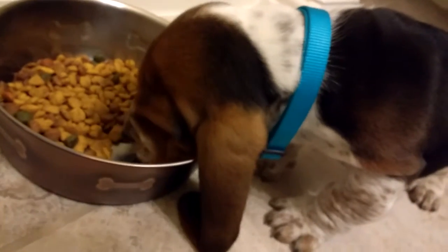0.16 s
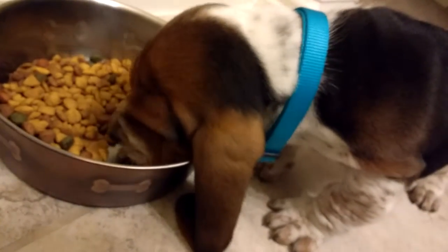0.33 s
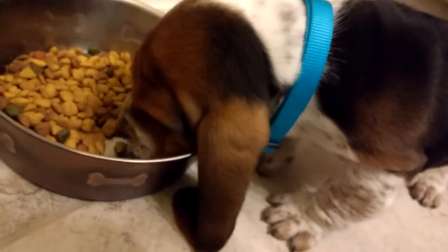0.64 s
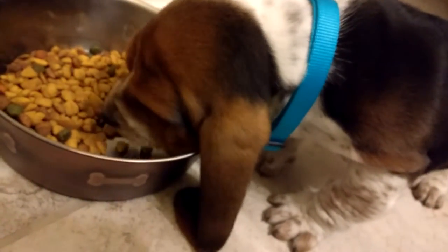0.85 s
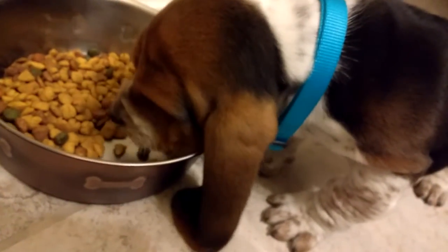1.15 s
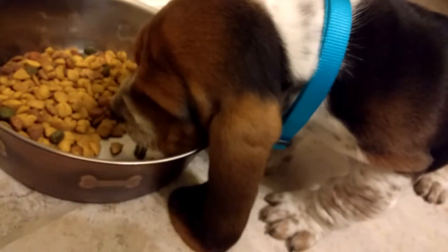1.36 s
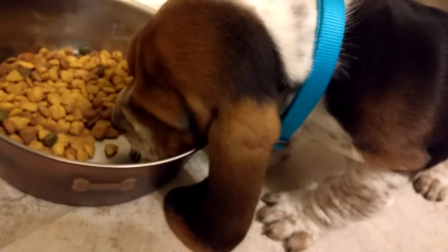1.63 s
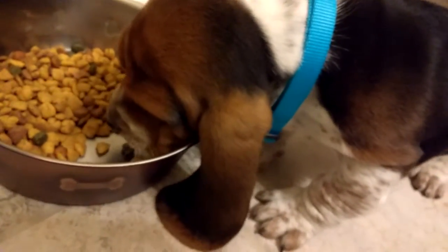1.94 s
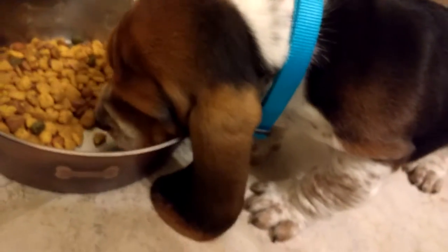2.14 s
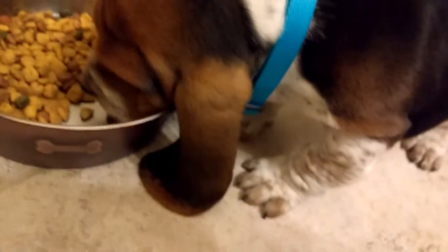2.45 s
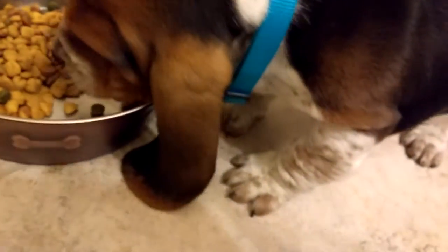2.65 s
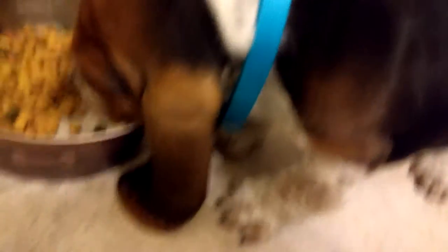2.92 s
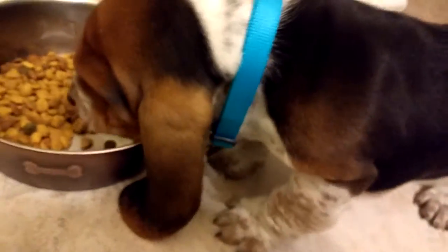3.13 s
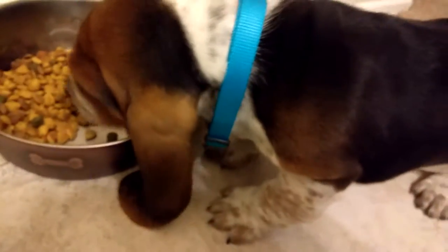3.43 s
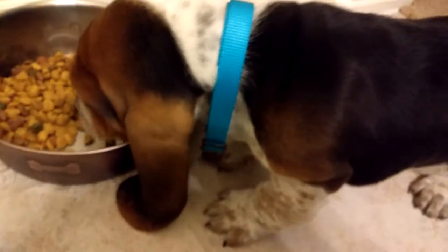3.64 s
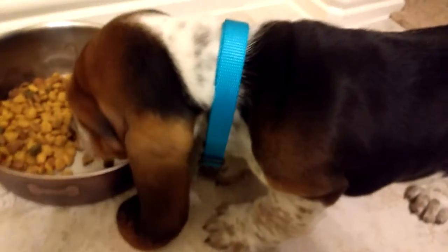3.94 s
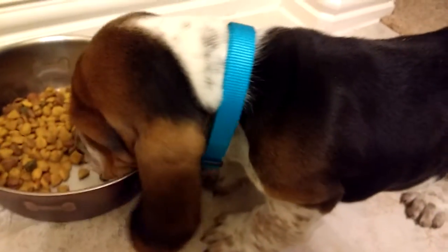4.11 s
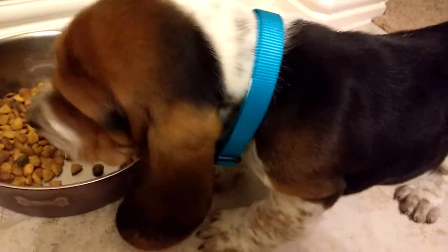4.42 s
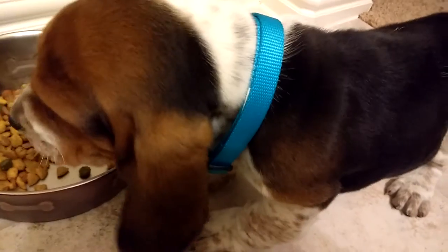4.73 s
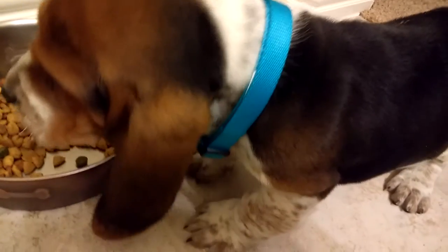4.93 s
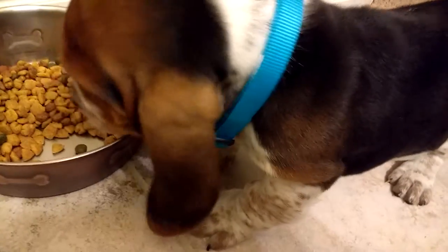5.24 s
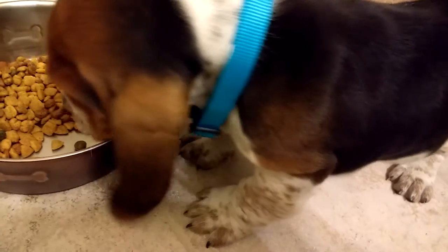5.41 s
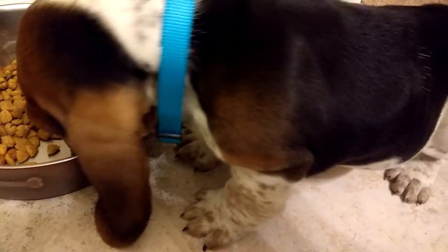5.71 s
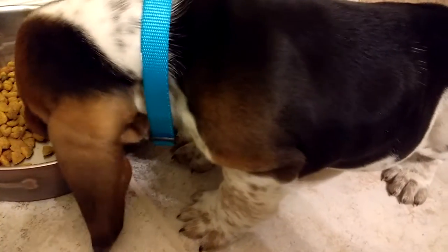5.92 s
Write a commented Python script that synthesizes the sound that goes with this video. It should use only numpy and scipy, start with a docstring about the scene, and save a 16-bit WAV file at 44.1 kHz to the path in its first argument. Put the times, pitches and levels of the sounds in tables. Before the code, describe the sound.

Close up indoors, a dog chews brittle pellets loudly at first, then softly, snuffling and rustling through the food over a low drone.

```python
"""Room tone and a low drone; a click, soft nose hisses and wet smacks; then a dog crunches dry kibble.
Heard from close above, from a steel bowl on a hard floor in a small live room. Hard crunches come early,
lighter ones later. Breaking pellets are impulse showers that ring mouth and jaw resonances; snaps, smacks
and clicks are short filtered showers; jowl flaps are damped sinking sines; stirred pellets, bowl hum,
nose and ear are shaped noise. A moving set of reflections and a widening recorder follow."""
import sys
import numpy as np
from scipy import signal
from scipy.fft import rfft, irfft, next_fast_len
from scipy.io import wavfile

SR = 44100
rng = np.random.default_rng(int(sys.argv[2]) if len(sys.argv) > 2 else 0)


def master_out(mix):
    """Clip the mix to full scale and print it as 16-bit PCM to the path in sys.argv[1]."""
    frames = np.transpose(np.atleast_2d(mix))
    ceiling = np.clip(frames, -1, 1)
    pcm = np.round(ceiling * 32767).astype(np.int16)
    wavfile.write(sys.argv[1], SR, pcm)


N = 267687
TIME = np.arange(N) / SR
HIT = TIME[:4096]  # time axis of one short event, s


def from_db(db):
    """Decibels to amplitude gain."""
    return 10 ** (np.asarray(db) / 20)


def rms_one(x):
    """Scale to rms 1."""
    return x / np.sqrt(np.mean(x ** 2) + 1e-20)


def unit(x):
    """Scale each channel to energy 1."""
    return x / np.sqrt(np.sum(x ** 2, axis=-1, keepdims=True) + 1e-20)


def at_hz(points, hz):
    """Interpolate a table on a log-frequency axis."""
    point_hz, value = np.transpose(points)
    return np.interp(np.log(np.maximum(hz, 1)), np.log(point_hz), value)


def colour(x, spectrum, lag_s=0):
    """Apply a spectrum and a pure delay in the frequency domain."""
    size = next_fast_len(x.shape[-1] + len(HIT))
    hz = np.fft.rfftfreq(size, 1 / SR)
    response = from_db(at_hz(spectrum, hz)) * np.exp(-2j * np.pi * hz * lag_s)
    return irfft(rfft(x, size) * response, size)[..., :x.shape[-1]]


def resonate(x, hz, width_hz):
    """Two-pole resonance with peak gain 1."""
    r = np.exp(-np.pi * width_hz / SR)
    zeros = np.array([1, 0, -1]) * (1 - r * r) / 2
    poles = [1, -2 * r * np.cos(2 * np.pi * hz / SR), r * r]
    return signal.lfilter(zeros, poles, x)


def resonate_twice(x, hz, width_hz):
    """Two equal resonances in series: steeper skirts."""
    return resonate(resonate(x, hz, width_hz), hz, width_hz)


def resonances(force, modes):
    """Parallel modes (hz, width_hz, level_db) of alternating sign, driven by one force."""
    return sum((-1) ** k * from_db(level_db) * resonate(force, hz, width_hz)
               for k, (hz, width_hz, level_db) in enumerate(modes))


def add(out, start_s, sound):
    """Mix a sound in at start_s."""
    i = max(round(start_s * SR), 0)
    out[i:i + len(sound)] += sound[:max(N - i, 0)]


def swells(rows):
    """Sum of half-cosine gain humps (middle_s, length_s, level_db)."""
    return sum(from_db(level_db) * np.cos(np.pi * np.clip((TIME - middle_s) / length_s, -.5, .5))
               for middle_s, length_s, level_db in rows)


def grains(size, per_s, spread_db):
    """Random clicks of random sign and uneven strength."""
    strength = from_db(spread_db * np.minimum(rng.exponential(1, size), 4))
    return (rng.random(size) < per_s / SR) * strength * rng.choice([-1, 1], size)


def fracture(crumble, fade_s):
    """One break, then a quickly thinning shower of smaller ones."""
    shower = grains(len(HIT), per_s=5000, spread_db=3)
    force = crumble * unit(shower * np.exp(-HIT / fade_s))
    force[0] += 1
    return force


# room tone spectrum: hz, relative level_db
ROOM_TONE_SPECTRUM = [(20, -28), (45, -28), (70, -0.5), (100, 0), (150, -2.5), (250, -7.5), (400, -10),
                      (800, -14.5), (1500, -22.5), (3500, -20.5), (8000, -25), (13500, -36), (16000, -34)]


def room_tone(level_db):
    """Steady coloured noise, independent in each channel."""
    return from_db(level_db) * rms_one(colour(rng.standard_normal((2, N)), ROOM_TONE_SPECTRUM))


def hum(level_db, hz, width_hz, lag_s):
    """Narrow-band noise: a low, unsteady drone that reaches the right side later."""
    drone = rms_one(resonate_twice(rng.standard_normal(N), hz, width_hz))
    return from_db(level_db) * np.array([drone, np.interp(TIME - lag_s, TIME, drone)])


# long ear brushing the floor: middle_s, length_s, level_db
EAR_BRUSHES = [(2.15, 1, -66)]
# fur spectrum: hz, relative level_db
FUR_SPECTRUM = [(1500, -15), (6000, -3), (10000, 2), (16000, 3)]


def ear():
    """Fur sliding over the hard floor: a soft, even hiss."""
    return swells(EAR_BRUSHES) * rms_one(colour(rng.standard_normal(N), FUR_SPECTRUM))


# puffs of air through the nose: middle_s, length_s
NOSE_PUFFS = [(0.116, 0.073), (0.27, 0.061), (1.478, 0.1), (2.07, 0.29), (2.683, .32), (2.931, .05),
              (3.137, 0.15), (3.574, 0.12), (4.16, .26), (4.438, 0.35), (4.9, 0.099), (5.17, 0.068),
              (5.353, 0.069), (5.522, 0.19), (5.826, .35)]
# nostril hiss spectrum: hz, relative level_db
NOSE_SPECTRUM = [(4000, -12), (5700, -15), (6450, 4.5), (7300, -5), (8500, -3), (10000, -11), (16000, -75)]
NOSE_DB, PUFF_S, PUFF_DB_PER_DOUBLING = -59, 0.12, -1  # level of a PUFF_S puff; longer is softer


def nose():
    """Thin hiss of narrow nostrils, stronger when the air is pushed out quickly."""
    puffs = [(middle_s, length_s, NOSE_DB + PUFF_DB_PER_DOUBLING * np.log2(length_s / PUFF_S))
             for middle_s, length_s in NOSE_PUFFS]
    return swells(puffs) * rms_one(colour(rng.standard_normal(N), NOSE_SPECTRUM))


# muzzle rubbing the bowl: middle_s, length_s, relative level_db
BOWL_RUBS = [(0.28, 0.29, -51.5), (2.8, 0.46, -49), (3.65, 0.67, -60.5), (6.02, 0.47, -47.5)]


def bowl(gain_db, hz, width_hz):
    """Friction noise keeps the lowest mode of the filled bowl ringing roughly."""
    friction = rng.standard_normal(N)
    return from_db(gain_db) * swells(BOWL_RUBS) * rms_one(resonate_twice(friction, hz, width_hz))


# muzzle effort in the pile: time_s, relative level_db
STIR_EFFORT = [(0, -60), (0.17, -58), (0.36, -54), (0.6, -62), (0.9, -53.5), (1.1, -65), (1.88, -61.5),
               (2.08, -51.5), (2.45, -56), (3.0, -54), (3.22, -59.5), (3.42, -52), (3.8, -50), (4.05, -57),
               (4.28, -64.5), (4.95, -76.5), (5.6, -62), (6.07, -58.5)]
# dull pellet contacts, spectrum: hz, relative level_db
DULL_SPECTRUM = [(200, -14), (380, -13), (520, 2.5), (680, -10), (840, -4.5), (1000, -11), (1250, -7.5),
                 (1700, -11), (2600, -7.5), (5000, -48)]
# crisp pellet rubbing, spectrum: hz, relative level_db
CRISP_SPECTRUM = [(1200, 11.5), (2200, 0), (3300, 5.5), (5000, 11.5), (8500, 5), (13000, -17), (16000, -16)]


def rustle(low_db, crisp_db, crisp_follows):
    """Pellets rub and tumble as the muzzle pushes through: dull contacts plus crisp rubbing."""
    effort_db = np.interp(TIME, *np.transpose(STIR_EFFORT))
    contacts = rms_one(grains(N, per_s=700, spread_db=5))
    rubbing = rms_one(contacts + .8 * rng.standard_normal(N))
    dull = from_db(effort_db + low_db) * rms_one(colour(contacts, DULL_SPECTRUM))
    crisp_gain = from_db(crisp_db + crisp_follows * (effort_db - effort_db.mean()))
    return dull + crisp_gain * rms_one(colour(rubbing, CRISP_SPECTRUM))


# jowls flapping shut: start_s, relative level_db
JOWL_FLAPS = [(0.802, -31), (1.092, -31), (1.415, -36.5), (2.027, -35), (2.534, -38), (2.994, -30),
              (3.453, -24), (5.32, -26.5)]
FLAP_HZ, FLAP_HZ_PER_DB, FLAP_SAG_PER_S = 299, 7, 10.4  # hardest flap's start pitch; softer is lower
FLAP_SLOWER_PER_DB = 0.08  # softer flaps take longer


def flaps(gain_db, rise_s, fade_s, late_s):
    """Cheeks trap an air pocket: a few low damped cycles, higher and shorter when shut harder."""
    out = np.zeros(N)
    hardest_db = max(level_db for _, level_db in JOWL_FLAPS)
    for start_s, level_db in JOWL_FLAPS:
        softer_db = hardest_db - level_db
        t = HIT / (1 + FLAP_SLOWER_PER_DB * softer_db)
        swell = (1 - np.exp(-t / rise_s)) ** 2 * np.exp(-t / fade_s)
        hz = (FLAP_HZ - FLAP_HZ_PER_DB * softer_db) * np.exp(-FLAP_SAG_PER_S * HIT)
        cycles = np.sin(2 * np.pi * np.cumsum(hz) / SR)
        add(out, start_s + late_s, from_db(level_db + gain_db) * swell / swell.max() * cycles)
    return out


# wet smacks of tongue and lips: start_s, relative level_db, pitch_hz
TONGUE_SMACKS = [(0.265, -41, 4070), (0.323, -44.5, 3270), (0.358, -41.5, 3230), (0.442, -33.5, 2784),
                 (3.432, -31, 6940), (3.444, -28, 8800), (4.0177, -30, 4900), (4.028, -33.5, 5560),
                 (4.156, -43, 3300), (4.177, -41, 3070), (4.449, -40, 2980), (4.485, -43.5, 13000),
                 (4.564, -37, 2280), (5.756, -36.5, 1960), (5.917, -32, 2170), (5.932, -28.5, 2240)]
# saliva spray spectrum: hz, relative level_db
SPRAY_SPECTRUM = [(1500, -29), (3000, -83), (6000, 107), (11000, -25), (16000, -33)]


def smacks(gain_db, width_share, spray):
    """A saliva film tears in a few quick pops that ring a tiny cavity."""
    out = np.zeros(N)
    for start_s, level_db, pitch_hz in TONGUE_SMACKS:
        pop = fracture(crumble=0.95, fade_s=0.0005)
        cavity = unit(resonate_twice(pop, pitch_hz, width_share * pitch_hz))
        wet_pop = unit(cavity + spray * unit(colour(pop, SPRAY_SPECTRUM)))
        add(out, start_s, from_db(level_db + gain_db) * wet_pop)
    return out


# dry ticks of teeth and crumbs: start_s, relative level_db, pitch_hz
DRY_TICKS = [(0.067, -34, 5340), (2.879, -32.5, 6330), (4.745, -40.5, 6140), (5.093, -30.5, 4840),
             (5.438, -39, 6800), (5.783, -38, 7640)]
TOOTH_HZ, TOOTH_DB, TOOTH_LATE_S = 11100, -10, 0.0022  # teeth meet after the pellet gives; dB re its snap


def ticks(gain_db, width_share):
    """Two hard points touch, alone or at the end of a bite: a bright click."""
    out = np.zeros(N)
    teeth = [(start_s + TOOTH_LATE_S, snap_db + TOOTH_DB, TOOTH_HZ) for start_s, *_, snap_db in BITE_EVENTS]
    for start_s, level_db, pitch_hz in DRY_TICKS + teeth:
        contact = fracture(crumble=0.73, fade_s=0.00083)
        click = unit(resonate_twice(contact, pitch_hz, width_share * pitch_hz))
        add(out, start_s, from_db(level_db + gain_db) * click)
    return out


# brittle crack spectrum, also for crumbs: hz, relative level_db
SNAP_SPECTRUM = [(1200, -17.5), (2000, 1), (3200, 0), (5000, -6.5), (9500, -11), (16000, -44)]


def snaps(gain_db, late_s):
    """The crack running through a pellet: a bright burst of a few milliseconds."""
    out = np.zeros(N)
    for start_s, *_, snap_db in BITE_EVENTS:
        crack = colour(fracture(crumble=0.9, fade_s=0.0022), SNAP_SPECTRUM, late_s)
        add(out, start_s, from_db(snap_db + gain_db) * unit(crack))
    return out


CREAK_S, CRUMBLE_S, CRUMBS_PER_S = 0.012, 0.038, 800  # time constants before and after the break; rate


def crumbs(ring_db, crisp_db, follows):
    """Tiny cracks build up as a pellet is loaded and die away as its pieces are ground."""
    strain = 0
    for start_s, bite_db, *_ in BITE_EVENTS:
        log_gain = np.minimum((TIME - start_s) / CREAK_S, (start_s - TIME) / CRUMBLE_S).clip(-30)
        strain = strain + from_db(follows * bite_db) * np.exp(log_gain)
    force = strain * rms_one(grains(N, per_s=CRUMBS_PER_S, spread_db=5.5))
    ring = resonances(force, MOUTH_MODES)
    return from_db(ring_db) * ring + from_db(crisp_db) * colour(force, SNAP_SPECTRUM)


# pellets breaking between the teeth, levels relative: start_s, ring_db, pitch_hz, knock_db, snap_db
BITE_EVENTS = [(0.443, -36, 1180, -51.5, -52), (0.456, -29, 1330, -56, -47), (0.547, -21, 1165, -34, -48),
               (0.854, -32.5, 1140, -56, -47.5), (0.887, -29, 1180, -51, -57), (0.919, -13, 1090, -34, -31),
               (0.952, -14, 1300, -30, -28.5), (0.969, -15.5, 1320, -57, -61),
               (1.16, -36.5, 1210, -55, -47), (1.198, -29, 1200, -67, -52), (1.233, -15.5, 1100, -41, -37),
               (1.274, -26, 1140, -60, -42), (1.58, -17.5, 942, -41, -40.5), (1.605, -14.5, 1080, -32, -36),
               (1.636, -22, 1230, -50, -58), (1.649, -21, 1180, -39, -30.5), (1.69, -12, 1065, -34.5, -32),
               (1.729, -11.5, 890, -26.5, -32), (2.02, -25.5, 965, -66, -45.5), (2.238, -17, 875, -37, -44),
               (2.271, -17, 940, -32, -34.5), (2.67, -35, 1105, -50, -66), (2.922, -41.5, 1220, -53, -42.5),
               (3.091, -35.5, 1430, -68, -43.5), (3.121, -31.5, 1300, -47, -40),
               (3.529, -35, 1190, -51, -48.5), (3.759, -36, 813, -47, -58), (4.018, -33.5, 813, -45.5, -58),
               (4.204, -40.5, 1280, -49, -42), (4.334, -43.5, 814, -59, -50),
               (4.468, -40, 1290, -49.5, -52), (4.562, -31, 820, -46, -69), (5.037, -38.5, 830, -44, -71),
               (5.173, -34, 794, -49.5, -44), (5.416, -41.5, 819, -64, -43.5),
               (5.608, -36.5, 800, -56, -50.5), (5.755, -40, 810, -51, -58), (5.785, -53, 1190, -43.5, -70),
               (5.927, -35, 1350, -56, -54)]
# mouth and bowl resonances: hz, width_hz, relative level_db
MOUTH_MODES = [(633, 140, -17), (850, 78.5, 5.5), (1184, 134, 4), (1358, 300, -2), (1930, 570, -12)]
# dull jaw resonances: hz, width_hz, relative level_db
JAW_MODES = [(326, 112, -4), (494, 26.5, 1.5), (587, 67, -0.5)]


def bites(ring_db, knock_db, focus_db, focus_hz, late_s):
    """Each break knocks the jaw and rings the mouth, most near the pitch that its opening sets."""
    out = np.zeros(N)
    for start_s, bite_db, pitch_hz, dull_db, _ in BITE_EVENTS:
        force = fracture(crumble=0.7, fade_s=0.0089)
        focused = [(hz, width_hz, level_db + focus_db * np.exp(-((hz - pitch_hz) / focus_hz) ** 2))
                   for hz, width_hz, level_db in MOUTH_MODES]
        ring = from_db(bite_db + ring_db) * unit(resonances(force, focused))
        knock = from_db(dull_db + knock_db) * unit(resonances(force, JAW_MODES))
        add(out, start_s + late_s, ring + knock)
    return out


PORT_LAG_S = 0.000286


def ports(x):
    """Direct sound reaches the left microphone port first."""
    return np.array([x, np.interp(TIME - PORT_LAG_S, TIME, x)])


# first returns from bowl, floor, walls and cupboards: delay_s, relative level_db
EARLY_ECHOES = [(.002, 2), (.0055, -6), (0.016, -7), (0.03, -4.5), (.046, -18), (0.055, -17.5)]
# room decay: hz, t60_s
ROOM_DECAY = [(150, 0.31), (600, 0.32), (1200, 0.37), (3500, 0.26), (8000, 0.22), (16000, 0.17)]


def room_response(echo_db, tail_db, smear_s, wall_hz):
    """Smeared dull echoes and a noise tail that dies by band, different at each port."""
    t = TIME[:SR // 2]
    edges_hz = np.geomspace(60, 19000, 9)
    tail = 0
    for low_hz, high_hz in zip(edges_hz, edges_hz[1:]):
        band_filter = signal.butter(2, [low_hz, high_hz], "band", fs=SR, output="sos")
        band = signal.sosfilt(band_filter, rng.standard_normal((2, len(t))))
        t60_s = at_hz(ROOM_DECAY, np.sqrt(low_hz * high_hz))
        tail = tail + band * from_db(-60 * t / t60_s)
    echoes = 0
    for delay_s, level_db in EARLY_ECHOES:
        smear = (t >= delay_s) * np.exp(-abs(t - delay_s) / smear_s)
        echoes = echoes + from_db(level_db) * unit(rng.standard_normal((2, len(t))) * smear)
    pole = np.exp(-2 * np.pi * wall_hz / SR)
    dull_echoes = signal.lfilter([1 - pole], [1, -pole], echoes)
    return from_db(echo_db) * dull_echoes + from_db(tail_db) * unit(tail)


def room(x, bobs_per_s, count):
    """The head bobs: the sound passes smoothly from one set of reflections to the next."""
    out = 0
    for k in range(count):
        share = np.maximum(np.cos(2 * np.pi * (bobs_per_s * TIME - k / count)), 0) ** 2
        response = room_response(echo_db=-2.0, tail_db=-2, smear_s=0.0013, wall_hz=4000)
        out = out + signal.fftconvolve((share * x)[None], response, axes=1)[:, :N]
    return out


def scene():
    """The dog at its bowl; each sound stirs the room by its own share."""
    chewing = bites(ring_db=15.5, knock_db=24.0, focus_db=8.5, focus_hz=245, late_s=.0003)
    chewing = chewing + crumbs(ring_db=-18, crisp_db=-37, follows=0.85)
    rooting = rustle(low_db=-0.58, crisp_db=-65.0, crisp_follows=1.0)
    rooting = rooting + bowl(gain_db=-2.5, hz=493, width_hz=70)
    body = chewing + rooting + nose() + ear()
    thuds = flaps(gain_db=-4.0, rise_s=0.0015, fade_s=0.0034, late_s=0.0017)
    cracks = snaps(gain_db=21.5, late_s=0.000739)
    wet = smacks(gain_db=12.5, width_share=0.3, spray=0.05)
    clicks = ticks(gain_db=8.5, width_share=0.44)
    direct = ports(body + thuds + cracks + wet + clicks)
    sent = body + from_db(-1) * thuds + from_db(1.5) * cracks + from_db(2) * wet + from_db(3.5) * clicks
    reflected = room(sent, bobs_per_s=2.8, count=4)
    drone = hum(level_db=-57.5, hz=94.7, width_hz=61, lag_s=0.002)
    return direct + reflected + room_tone(level_db=-52.5) + drone


# share of the opposite port that is subtracted: hz, level_db
CROSSFEED_SPECTRUM = [(100, -14), (400, -9), (1200, -4), (2450, -2), (5000, -4), (7500, -4.5), (10000, -10),
                      (12500, -18)]
# right channel equalisation: hz, gain_db
RIGHT_SPECTRUM = [(100, 0), (250, .3), (500, -1.2), (1300, 1.6), (4000, -.8), (8000, -.4), (12000, 6.5)]
CROSSFEED_LAG_S, CUTOFF_HZ = 0.0004071, 15600


def record(dry):
    """The recorder widens by subtracting each port, delayed, from the other; the top is cut."""
    left, right = dry - colour(dry[::-1], CROSSFEED_SPECTRUM, CROSSFEED_LAG_S)
    wide = np.array([left, colour(right, RIGHT_SPECTRUM)])
    low_pass = signal.ellip(10, .2, 70, CUTOFF_HZ, fs=SR, output="sos")
    return signal.sosfilt(low_pass, wide)


dry = scene()
out = record(dry)
master_out(out)
```